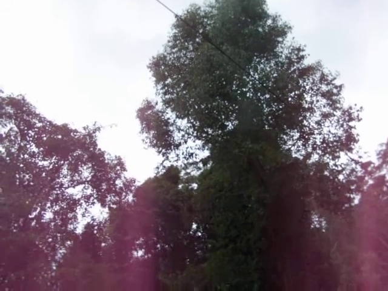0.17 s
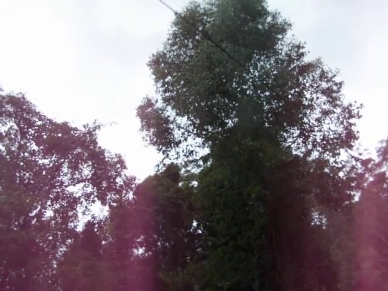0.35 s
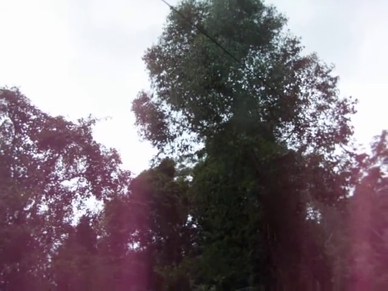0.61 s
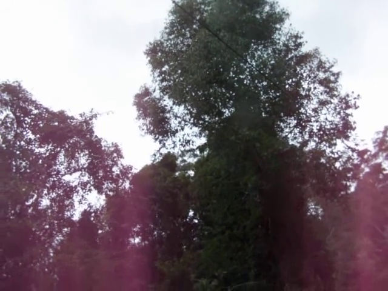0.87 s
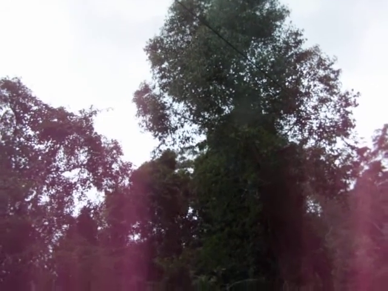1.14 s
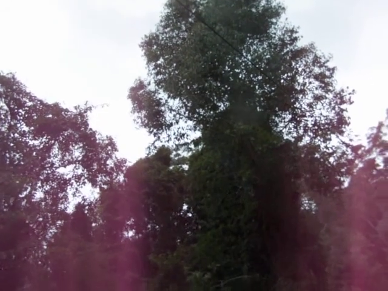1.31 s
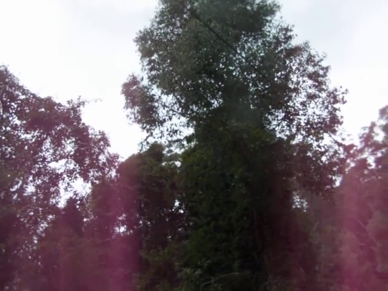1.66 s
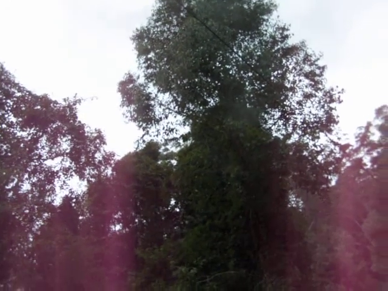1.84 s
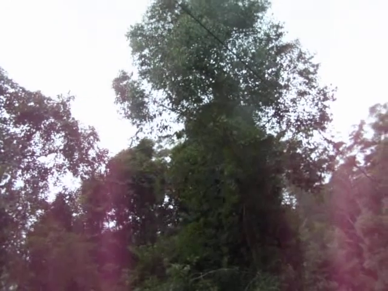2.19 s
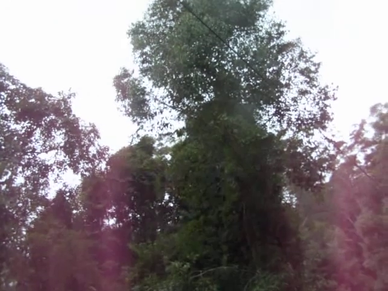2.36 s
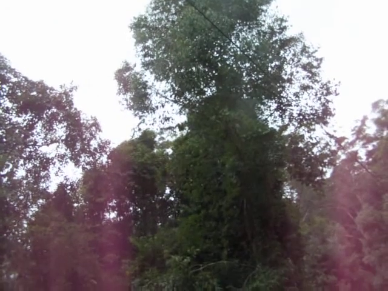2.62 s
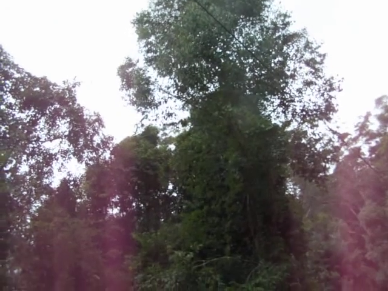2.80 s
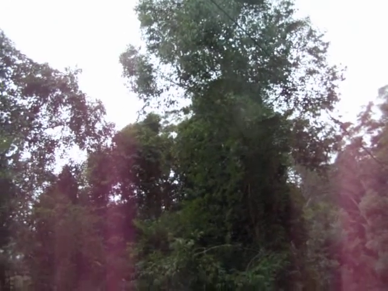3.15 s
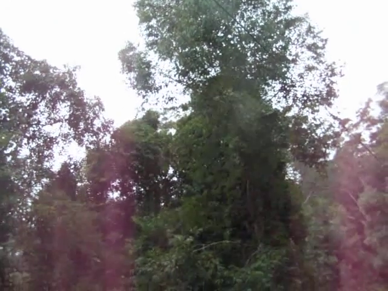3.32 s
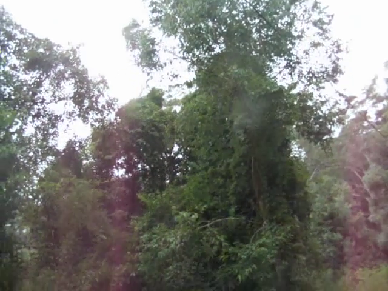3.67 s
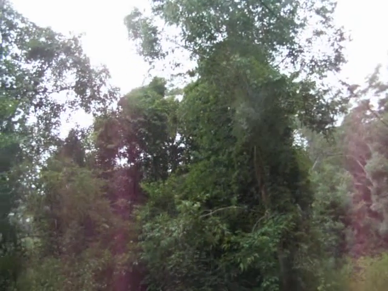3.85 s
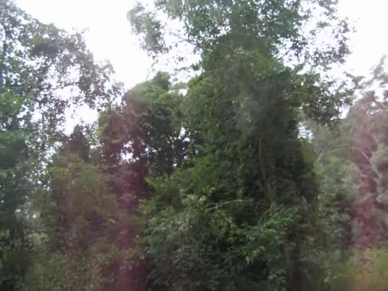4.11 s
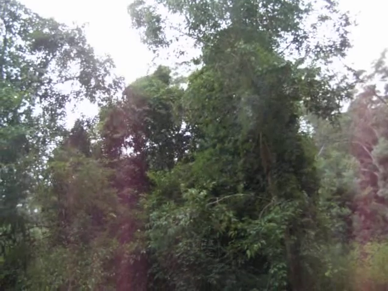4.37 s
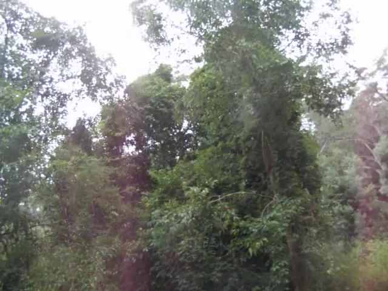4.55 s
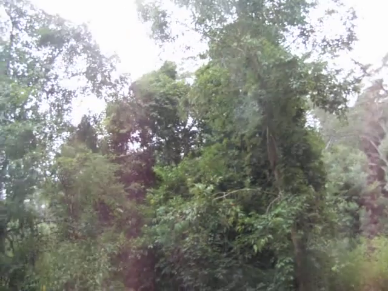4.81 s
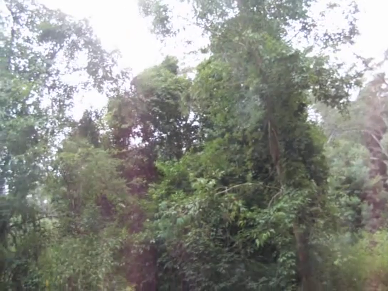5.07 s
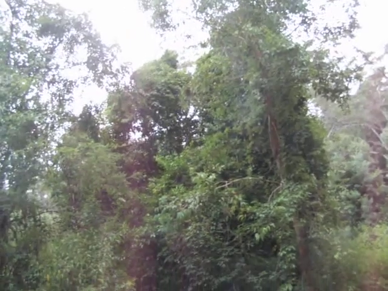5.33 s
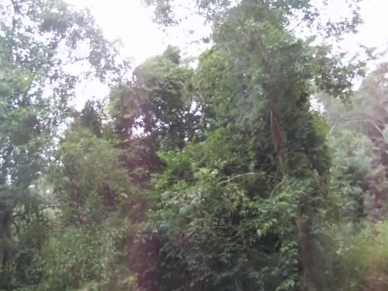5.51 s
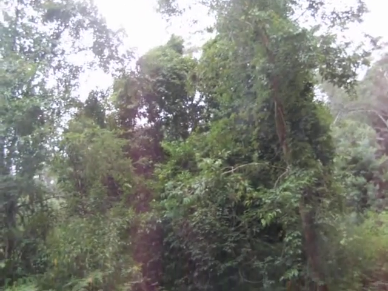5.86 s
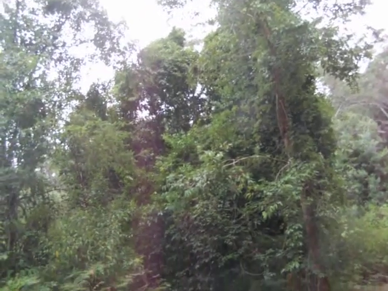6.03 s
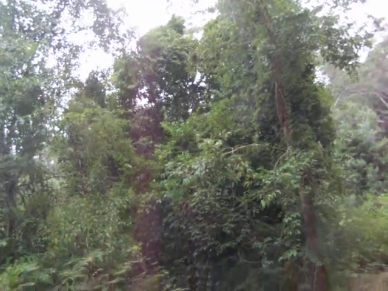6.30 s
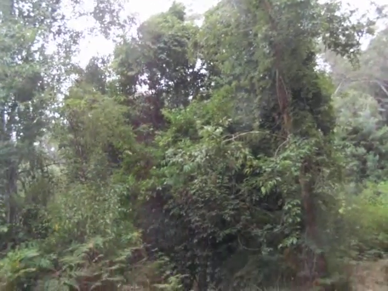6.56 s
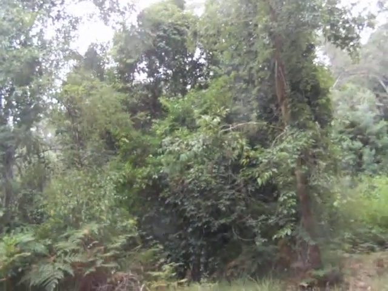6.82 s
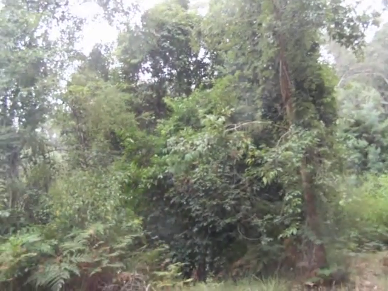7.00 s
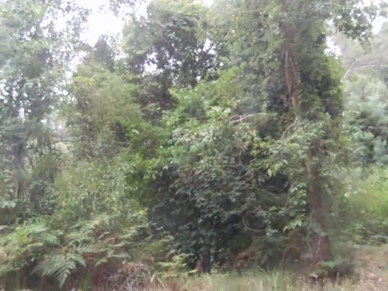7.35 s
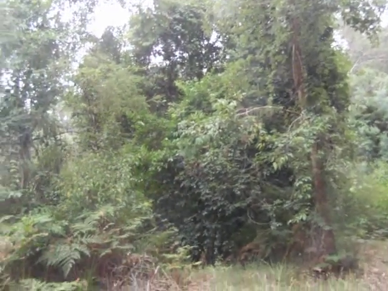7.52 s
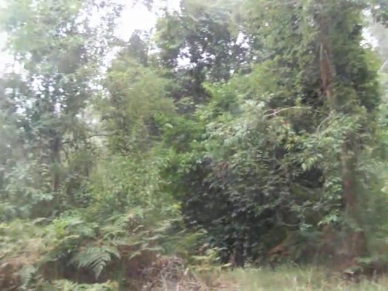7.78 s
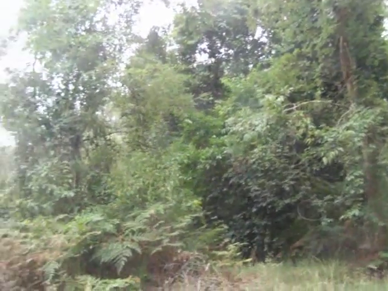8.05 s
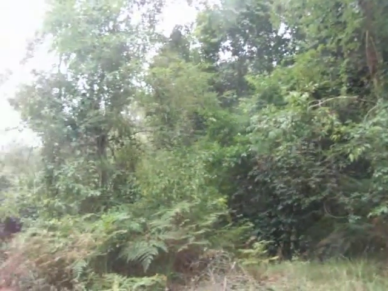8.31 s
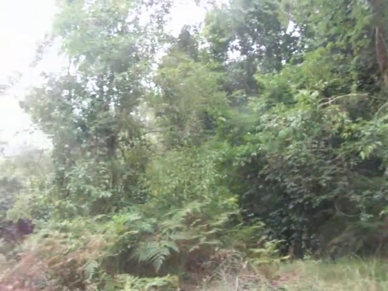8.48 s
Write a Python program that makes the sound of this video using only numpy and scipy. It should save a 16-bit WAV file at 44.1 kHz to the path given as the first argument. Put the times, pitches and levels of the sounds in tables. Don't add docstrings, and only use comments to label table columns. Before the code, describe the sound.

Outdoors in hilly forest, bell miners give irregular short, pure bell-like tinks, close and distant, each ringing on in fluttering echoes. A thin far whistle opens over the first calls; a small bird adds hoarse rising chips. Steady leaf hiss and a barely audible vehicle hum lie beneath. Fingers knock the handheld recorder from the middle on, and a strap creaks late.

```python
import sys
import numpy as np
from scipy import signal
from scipy.fft import rfft, irfft, next_fast_len
from scipy.io import wavfile
from scipy.ndimage import uniform_filter1d

SR = 44100
rng = np.random.default_rng(int(sys.argv[2]) if len(sys.argv) > 2 else 0)


def wrap_up_sound(samples):
    columns = np.atleast_2d(samples).T
    tamed = np.clip(columns, -1, 1)
    steps = np.round(tamed * 32767).astype(np.int16)
    wavfile.write(sys.argv[1], SR, steps)


def convert_level_to_amplitude(level_db):
    exponent = np.asarray(level_db, float) / 20
    return 10 ** exponent


N = 382347

# start in seconds, pitch in Hz, tone in dB, opening tick in dB,
# forest ring in dB.
CLOSE_CALLS = [(0.458, 2857, -23, -11, -30.5), (1.171, 2835, -10, -12, -31),
               (1.232, 2863, -13, -20.5, -21.5), (1.781, 2762, -16.5, -21.5, -34),
               (2.309, 2836, -12, -22.5, -26.5), (2.617, 2780, -17.5, -30, -31.5),
               (3.017, 2829, -16.5, -23.5, -30.5), (3.837, 2834, -21, -35, -29),
               (3.891, 2768, -14.5, -16.5, -30.5), (3.959, 2830, -11, -17.5, -26.5),
               (4.032, 2855, -15.5, -27, -26), (4.406, 2830, -14, -12.5, -29),
               (4.77, 2829, -22, -21.5, -33.5), (5.916, 2885, -16.5, -20.5, -38),
               (7.235, 2861, -22.5, -17, -30), (7.358, 2809, -11, -23, -28),
               (8.344, 2822, -20.5, -34, -29.5), (8.609, 2885, -13.5, -15, -26.5)]
# start in seconds, pitch in Hz, tone in dB,
# opening tick in dB, forest ring in dB.
FAR_CALLS = [(0.329, 2860, -30.5, -34, -39.5), (0.493, 3310, -44, -42.5, -48),
             (0.689, 2930, -25, -29.5, -35), (1.278, 3230, -15, -22.5, -35),
             (1.795, 2862, -18.5, -29.5, -30), (2.873, 2780, -30.5, -32.5, -39.5),
             (2.959, 2891, -30, -31.5, -35.5), (3.449, 2845, -23, -36, -32), (3.781, 2870, -45, -25.5, -46),
             (3.934, 3900, -35, -47, -59), (4.14, 3022, -26, -28.5, -30), (5.27, 2877, -35.5, -34, -43),
             (5.763, 2860, -24, -27.5, -39), (6.219, 2850, -33, -31.5, -42), (6.892, 2845, -26.5, -31, -36),
             (7.27, 3157, -39, -43, -49.5), (7.991, 2884, -27.5, -25.5, -33), (8.03, 2957, -26, -29, -37)]
# start in seconds, second harmonic in dB below the tone,
# third harmonic in dB.
NEAR_OVERTONES = [(0.458, -26, -80), (0.69, -28.5, -72.5), (1.171, -40, -70), (1.234, -29.5, -67),
                  (2.309, -33.5, -69), (2.96, -26, -76), (3.016, -30, -75), (3.837, -19.5, -59),
                  (4.405, -25, -52), (4.77, -30, -82), (7.359, -36.5, -69), (8.608, -23.5, -55)]
# time of peak in seconds, pitch in Hz, level in dB.
SLOPE_ECHOES = [(0.513, 2882, -15.5), (0.544, 2852, -18.5), (0.615, 2854, -18), (0.66, 2883, -17.5),
                (1.208, 2853, -12), (1.267, 2862, -16), (1.323, 2859, -10), (1.396, 2861, -16),
                (1.446, 2861, -14.5), (1.526, 2880, -20), (1.643, 2868, -24), (2.006, 2860, -20.5),
                (2.369, 2826, -14.5), (2.428, 2808, -23), (2.519, 2814, -19.5), (3.057, 2790, -14),
                (3.122, 2786, -25), (3.933, 2853, -18), (3.991, 2847, -5), (4.2, 2850, -16.5),
                (4.328, 2900, -24.5), (4.49, 2865, -18), (4.558, 2806, -20), (4.809, 2812, -17),
                (5.959, 2890, -15), (6.924, 2867, -20), (7.302, 2827, -27), (7.415, 2794, -14),
                (8.02, 2875, -21), (8.656, 2922, -9)]
# start in seconds, start pitch in Hz, end pitch in Hz, level in dB.
CHIPS = [(1.792, 5000, 6850, -36.5), (1.799, 4710, 5100, -25.5), (1.799, 5460, 7680, -43.5),
         (1.804, 4300, 4920, -25.5), (1.808, 4650, 5320, -29), (1.812, 6000, 7130, -38),
         (1.813, 3160, 5080, -24), (1.817, 6000, 7320, -37), (3.343, 4300, 3360, -30),
         (3.346, 2930, 4580, -32), (3.356, 4420, 5300, -33), (3.391, 3100, 4220, -36),
         (3.398, 3200, 4300, -31), (5.652, 4460, 6000, -42.5), (5.994, 3440, 5050, -36),
         (6.234, 4970, 6000, -43.5), (6.453, 4690, 6670, -37), (6.46, 5590, 7460, -39),
         (6.466, 3790, 4780, -29), (6.471, 5320, 6070, -32.5), (6.477, 2920, 4200, -25),
         (6.888, 4560, 6940, -47), (7.034, 3010, 4860, -28), (7.039, 3120, 5300, -37),
         (7.073, 3330, 4430, -42.5)]
# time in seconds, second harmonic in dB, fundamental in dB.
WHISTLE = [
    (0.3, -62, -56),
    (0.345, -48.5, -44),
    (0.512, -37.5, -42),
    (0.71, -48, -62),
    (0.95, -59, -59),
]
# start in seconds, peak in dB, then dull body, hollow note and bright crack
# in dB relative to the peak.
TICKS = [
    (2.995, -23.5, -13, -6, -30.5),
    (3.849, -20, -3, -11.5, -7),
    (4.232, -22.5, -6, -11.5, -6),
    (6.632, -33.5, -11, -10, -30),
    (7.115, -28, -26.5, -26, -4),
    (7.16, -24, -16, -8.5, -3),
    (7.573, -27.5, -29, -3.5, -33),
    (8.073, -39, -7, -4, -23),
    (8.315, -14.5, -9.5, -14, -6),
]
# pitch in Hz, level in dB, 60 dB decay in seconds.
CASING_MODES = [
    (307, -5, 0.034),
    (483, -8.5, 0.068),
    (680, -6.5, 0.038),
    (1140, -9, 0.018),
    (1500, -3.5, 0.017),
]
# pitch in Hz, level in dB, 60 dB decay in seconds.
HOLLOW_MODES = [
    (837, 4, 0.037),
]
# pitch in Hz, level in dB, 60 dB decay in seconds.
CRACK_MODES = [
    (2480, -6, 0.025),
    (3100, 14, 0.0052),
    (4300, -15, 0.0058),
    (6000, -36.5, 0.0064),
]
# time in seconds, pitch in Hz, level in dB.
CREAK = [
    (7.16, 1248, -39.5),
    (7.175, 1230, -33),
    (7.19, 1083, -40),
    (7.205, 706, -42),
    (7.225, 650, -40),
    (7.245, 620, -66.5),
]
# time in seconds, engine hum in Hz, level in dB.
HUM = [
    (0, 212, -67),
    (1.5, 222, -57.5),
    (3, 228, -60),
    (4.2, 231, -56.5),
    (5.2, 232, -63),
    (7, 228, -61.5),
    (8.67, 224, -68),
]
# frequency in Hz, density in dB per Hz.
AIR_COLOUR = [(22, -15.5), (120, -9.5), (300, -5.5), (480, -7.5), (600, -11), (830, -8.5), (1100, -11),
              (2200, -9), (3000, -1), (3700, 0), (5000, -9.5), (7300, -25), (8300, -28.5), (9000, -48)]
# time in seconds, level in dB.
GUSTS = [
    (1.3, -62),
    (2.33, -57.5),
    (8.3, -61),
]

ALL_CALLS = CLOSE_CALLS + FAR_CALLS
PEEP_HZ = 3150
SAG, SAG_S = .018, .014
SECOND_DB, OVERTONE_FADE_DB_PER_S = -38, 12
SAMPLING_HZ = 16000


def in_time(rows):
    s, *columns = np.transpose(rows)
    return [np.interp(np.arange(N) / SR, s, c) for c in columns]


def rms_one(x):
    return x / np.sqrt(np.mean(x ** 2) + 1e-20)


def drift(rate):
    r = np.exp(-80 * np.pi * rate / SR)
    slow = signal.lfilter([1], [1, -2 * r, r * r], rng.standard_normal(N // 40 + 2002))[2000:]
    return np.interp(np.arange(N) / 40, np.arange(len(slow)), rms_one(slow))


def noise_band(kind, order, hz):
    return signal.sosfilt(signal.butter(order, hz, kind, fs=SR, output="sos"), rng.standard_normal(N))


def add(out, s, piece):
    at = round(s * SR)
    out[at:at + len(piece)] += piece[:len(out) - at]


def turns(hz):
    return 2 * np.pi * np.cumsum(hz) / SR


def ring(clicks, hz, t60):
    r, w = convert_level_to_amplitude(-60 / (t60 * SR)), 2 * np.pi * hz / SR
    return signal.lfilter([0, np.sin(w)], [1, -2 * r * np.cos(w), r * r], clicks + 1e-18)


def voice(hz, second_db, start=0):
    phase = start + turns(hz)
    return np.sin(phase) + convert_level_to_amplitude(second_db) * np.sin(2 * phase)


def call_pitch(hz, t):
    return hz * (1 + SAG * (hz < PEEP_HZ) * np.exp(-t / SAG_S))


def overtones(s):
    return next((row[1:] for row in NEAR_OVERTONES if abs(row[0] - s) < .01), (SECOND_DB, -99))


def bell_miners():
    out = np.zeros(N)
    t = np.arange(round(.075 * SR)) / SR
    long = np.arange(round(1.6 * SR)) / SR
    forest = np.minimum(long / .073, 1) ** 2 * convert_level_to_amplitude(-60 * long / 2.2)
    leaves = convert_level_to_amplitude(-60 * long / 1.0)
    rise = np.sin(np.clip(t / .006, 0, 1) * np.pi / 2) ** 2
    direct = np.clip((.055 - t) / .031, 0, 1)
    tick_shape = (t / .0021 * np.exp(1 - t / .0026)) ** 2
    for s, hz, tone_db, tick_db, ring_db in ALL_CALLS:
        second_db, third_db = overtones(s)
        peep = hz > PEEP_HZ
        pitch = call_pitch(hz, t)
        drop = pitch * (1 + .2 * (hz < PEEP_HZ) * np.exp(-t / .003))
        meet = (turns(pitch) - turns(drop))[-1]
        tick = tick_shape * voice(drop, second_db - 10, meet)
        end_s = .035 if peep else t[-1]
        tone = rise * np.clip((end_s - t) / .028, 0, 1)
        sound = tone * voice(pitch, second_db)
        add(out, s, convert_level_to_amplitude(tick_db) * tick + convert_level_to_amplitude(tone_db) * direct * sound)
        scatter = rng.standard_normal(len(long)) / np.sqrt(len(t) / 2)
        add(out, s, convert_level_to_amplitude(ring_db - 7 - 8 * peep) * signal.fftconvolve(sound, scatter * forest))
        add(out, s, convert_level_to_amplitude(tick_db - 5) * signal.fftconvolve(tick, scatter * leaves))
        folded = np.sin(turns(SAMPLING_HZ - 3 * pitch))
        add(out, s, convert_level_to_amplitude(third_db) * tone * (folded + convert_level_to_amplitude(-4.5) * voice(3 * pitch, -99)))
    return out


def trunk_returns():
    rows, count = [], 64
    gap_s, first_s = .021, .06
    for s, hz, _, _, ring_db in ALL_CALLS:
        late, off, loud = rng.uniform(-1, 1, (3, count))
        after = first_s + gap_s * (np.arange(count) + .4 * late)
        fade_db_per_s = 29 * (1.2 if hz > PEEP_HZ else 1)
        level_db = ring_db + 8.5 - fade_db_per_s * after + 2.5 * loud
        pitch = hz + 13.1 + 36.3 * off
        second_db = overtones(s)[0] - OVERTONE_FADE_DB_PER_S * after
        rows += zip(s + after, pitch, level_db, second_db)
    return [row for row in rows if row[2] > -62]


def hillside_echoes():
    out = np.zeros(N + 2 * SR)
    t = np.arange(round(.055 * SR)) / SR
    swell = np.sin(np.pi * (t / t[-1]) ** .94) ** 1.3
    lead = .4 * t[-1]
    heard = [(s, hz, 2 * np.pi * SAG * SAG_S * hz) for s, hz, *_ in sorted(ALL_CALLS)]   # (s, Hz, phase)
    for s, hz, level_db in SLOPE_ECHOES:
        alike = (h for h in heard if h[0] < s and abs(h[1] - hz) < 90)
        then, then_hz, phase = max(alike, default=(s, hz, 0))
        source_s = max(c[0] for c in CLOSE_CALLS + FAR_CALLS[-2:] if c[0] < s)
        second_db = overtones(source_s)[0] - 3
        phase += np.pi * (then_hz + hz) * (s - then)
        heard.append((s, hz, phase))
        echo = voice(np.full(len(t), hz), second_db, phase - 2 * np.pi * hz * lead)
        add(out, s - lead, convert_level_to_amplitude(level_db - 1.5) * swell * echo)
    brief = signal.resample(swell, round(len(t) / 1.45))
    for s, hz, level_db, second_db in trunk_returns():
        echo = voice(np.full(len(brief), hz), second_db - 3, rng.uniform(0, 2 * np.pi))
        add(out, s - lead, convert_level_to_amplitude(level_db) * brief * echo)
    return out[:N] * (1 + .11 * drift(52))


def small_bird():
    out = np.zeros(N)
    rasp = rms_one(noise_band("low", 2, 700))
    for s, from_hz, to_hz, level_db in CHIPS:
        length_s = .005 + abs(to_hz - from_hz) / 260000
        share = np.linspace(0, 1, round(length_s * SR))
        pitch = from_hz + (to_hz - from_hz) * np.sin(share * np.pi / 2)
        add(out, s, convert_level_to_amplitude(level_db) * np.sin(np.pi * share) * np.sin(turns(pitch)))
    out = out * (1 + .6 * rasp)
    t = np.arange(round(.3 * SR)) / SR
    scatter = rng.standard_normal(len(t)) * convert_level_to_amplitude(-60 * t / .36)
    return out + convert_level_to_amplitude(-35.5) * signal.fftconvolve(out, scatter)[:N]


def whistler():
    upper_db, lower_db = in_time(WHISTLE)
    first, last = WHISTLE[0][0], WHISTLE[-1][0]
    on = np.interp(np.arange(N) / SR, [first - .03, first, last, last + .1], [0, 1, 1, 0])
    phase = turns(4815 + 25 * drift(7))
    upper = (.5 + .6 * drift(80)) * np.sin(phase) + .6 * drift(80) * np.cos(phase)
    lower = (.4 + .7 * drift(40)) * np.sin(phase / 2) + .7 * drift(40) * np.cos(phase / 2)
    return on * (convert_level_to_amplitude(upper_db) * upper + convert_level_to_amplitude(lower_db) * lower)


def finger_ticks():
    s, peak_db, body_db, hollow_db, crack_db = np.transpose(TICKS)
    at, out = np.round(s * SR).astype(int), np.zeros(N)
    for modes, share_db in ((CASING_MODES, body_db), (HOLLOW_MODES, hollow_db), (CRACK_MODES, crack_db)):
        for hz, level_db, t60 in modes:
            clicks = np.zeros(N)
            clicks[at] = convert_level_to_amplitude(peak_db + share_db + level_db + rng.normal(0, 1, len(at)))
            out += ring(clicks, hz, t60)
    return signal.sosfilt(signal.butter(2, [170, 6000], "band", fs=SR, output="sos"), out)


def strap_creak():
    hz, level_db = in_time(CREAK)
    on = np.abs(np.arange(N) / SR - 7.2) < .045
    phase = turns(hz)
    tone = np.sin(phase) + convert_level_to_amplitude(-14) * np.sin(2 * phase)
    return on * convert_level_to_amplitude(level_db - 3) * (.8 + .6 * drift(90)) * tone


def vehicle():
    hz, level_db = in_time(HUM)
    return convert_level_to_amplitude(level_db + 3 + 2.3 * drift(5.6)) * np.sin(turns(hz + 2.5 * drift(4.6)))


def leaves_and_road():
    size = next_fast_len(N)
    hz, level_db = np.transpose(AIR_COLOUR)
    octave = np.log2(np.maximum(np.fft.rfftfreq(size, 1 / SR), 1))
    colour = rfft(rng.standard_normal(size)) * convert_level_to_amplitude(np.interp(octave, np.log2(hz), level_db))
    out = np.zeros(N)
    for centre in np.arange(4, 14, .5):
        band = np.clip(1 - 2 * np.abs(octave - centre), 0, 1)
        out += convert_level_to_amplitude(1.2 * drift(9.5) + .5 * drift(60)) * irfft(colour * band, size)[:N]
    return convert_level_to_amplitude(-42 + 3) * rms_one(out)


def wind():
    t = np.arange(N) / SR
    calm_db, gust_s = -70, .22
    puffs = convert_level_to_amplitude(calm_db) + sum(convert_level_to_amplitude(db) * np.exp(-((t - s) / gust_s) ** 2) for s, db in GUSTS)
    return puffs * rms_one(noise_band("band", 2, [22, 70]))


def scene():
    birds = bell_miners() + hillside_echoes() + small_bird() + whistler()
    hands = finger_ticks() + strap_creak()
    return (birds + hands + vehicle() + leaves_and_road() + wind())[None]


def roll_off(x):
    return signal.sosfilt(signal.butter(12, 8940, fs=SR, output="sos"), x)


def record(dry):
    level = np.sqrt(uniform_filter1d(dry ** 2, size=1024) + 1e-10)
    fall = 30 * np.arange(N) / SR
    held_db = np.maximum.accumulate(20 * np.log10(level) + fall, axis=1) - fall
    x = dry * convert_level_to_amplitude(-.35 * np.maximum(held_db + 16, 0))
    x = x + convert_level_to_amplitude(-32) * level * noise_band("band", 4, [3000, 7600])
    x = signal.sosfilt(signal.cheby2(8, 45, 9600, fs=SR, output="sos"), x)
    x = x * np.clip((N + 3 - np.arange(N)) / 12, 0, 1)
    return roll_off(x)


dry = scene()
out = record(dry)
wrap_up_sound(out)
```